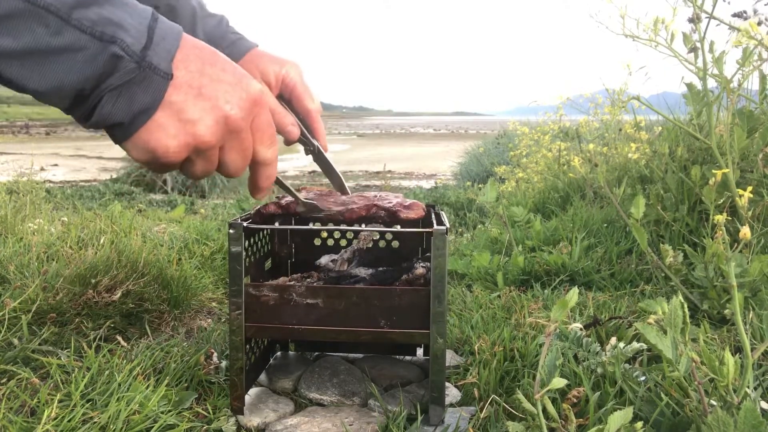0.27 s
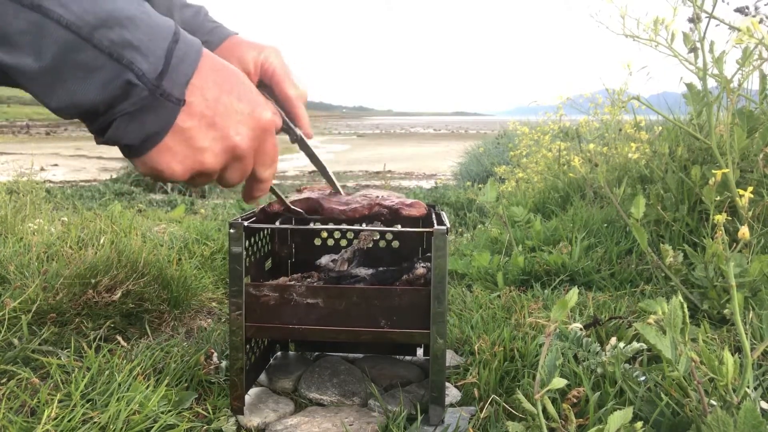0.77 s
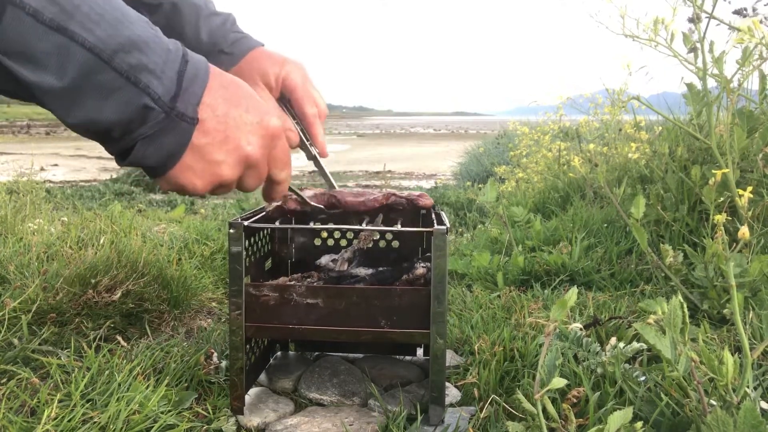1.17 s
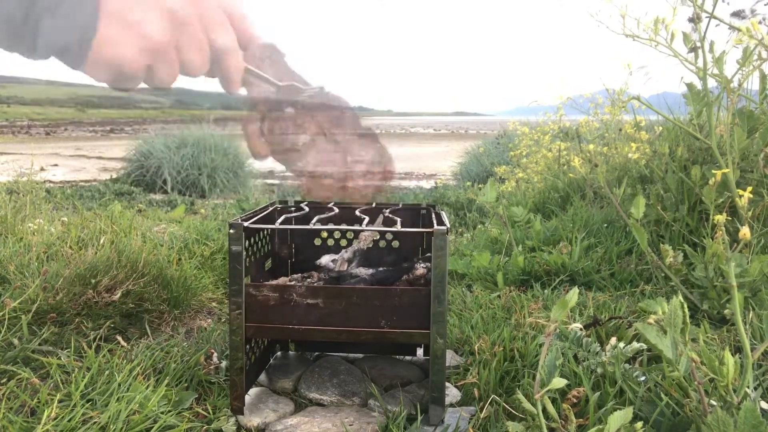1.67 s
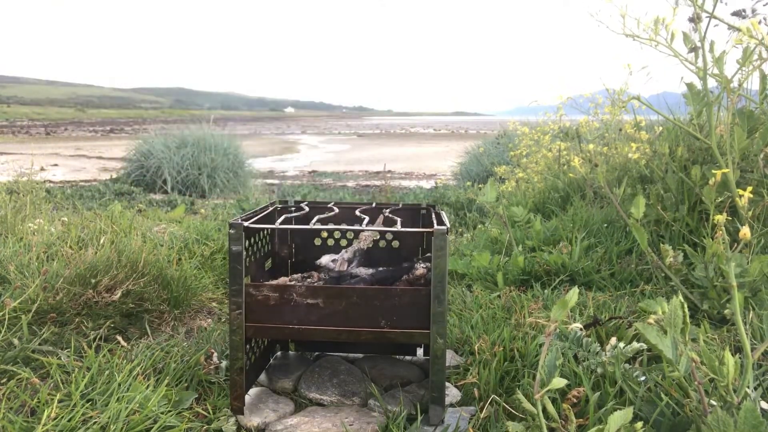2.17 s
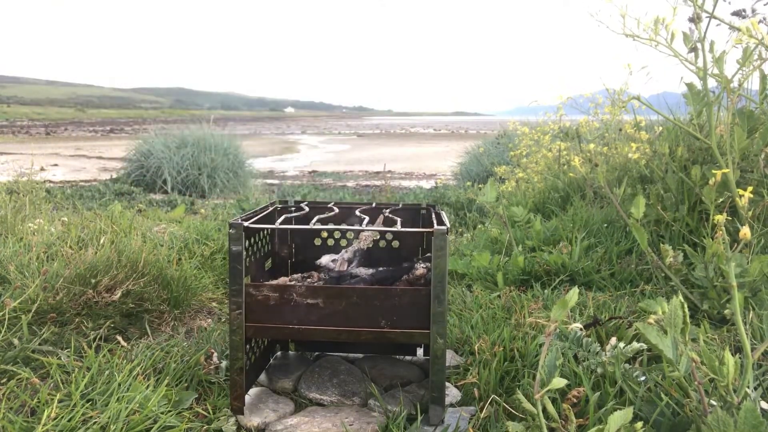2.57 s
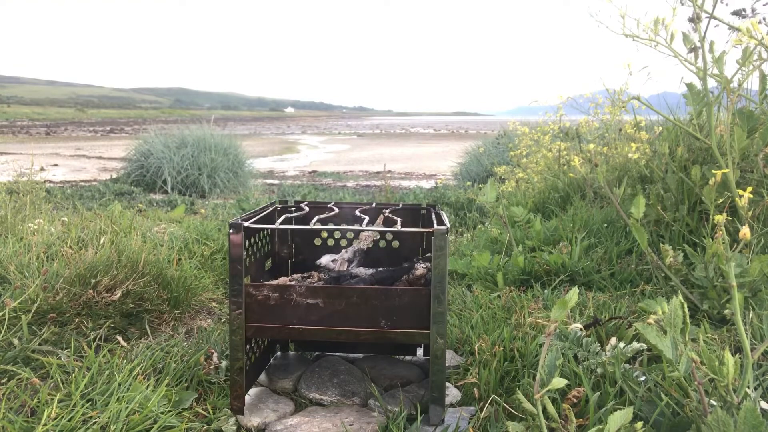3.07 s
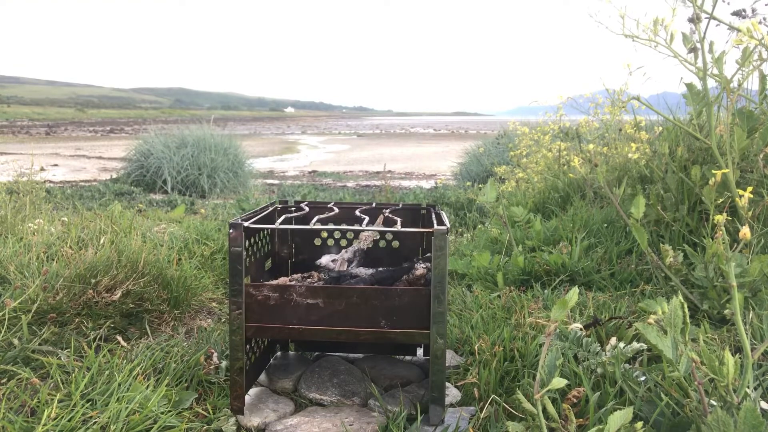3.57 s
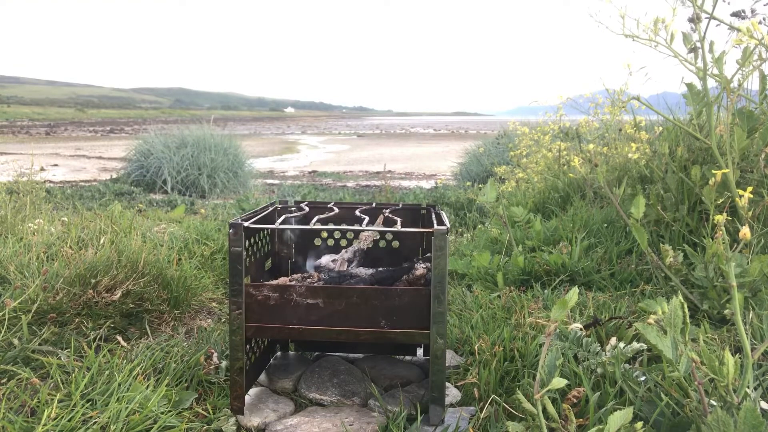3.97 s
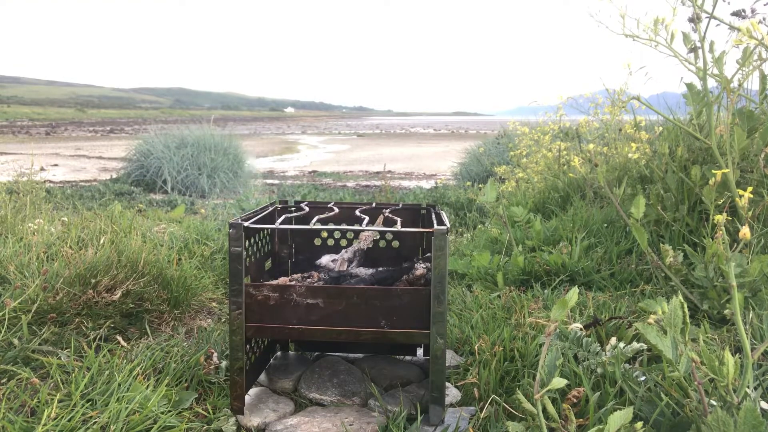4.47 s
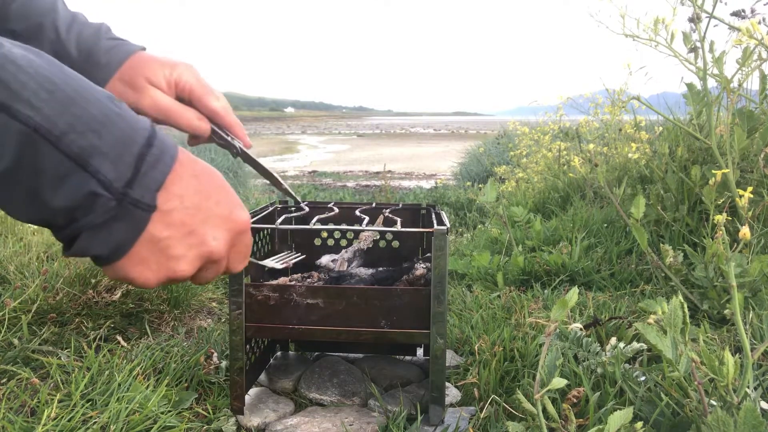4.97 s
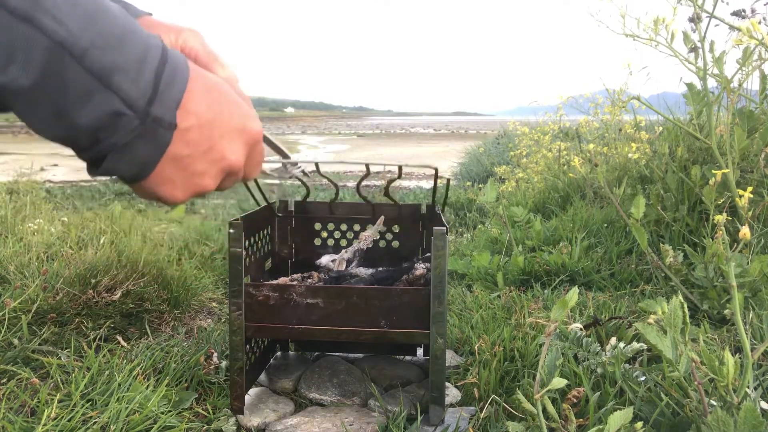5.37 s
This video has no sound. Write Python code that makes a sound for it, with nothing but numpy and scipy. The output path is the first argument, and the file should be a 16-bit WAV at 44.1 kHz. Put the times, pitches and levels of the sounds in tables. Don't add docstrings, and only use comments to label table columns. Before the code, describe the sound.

Wind buffets an open-air microphone while meat sizzles faintly, cutlery scrapes a wire grill, then thin metal clatters and scrapes loudly before quieting.

```python
import sys
import numpy as np
from scipy import signal
from scipy.fft import rfft, irfft
from scipy.io import wavfile
from scipy.ndimage import uniform_filter1d

SR = 44100
rng = np.random.default_rng(int(sys.argv[2]) if len(sys.argv) > 2 else 0)


def natural_amplitude(level_db):
    exponent = np.asarray(level_db, float) / 20
    return 10 ** exponent


def wav_record(signal):
    frames = np.transpose(np.atleast_2d(signal))
    bounded = np.clip(frames, -1, 1)
    quanta = np.round(bounded * 32767).astype(np.int16)
    wavfile.write(sys.argv[1], SR, quanta)


N = 248724
TIME = np.arange(N) / SR

# (time [s], level [dB])
GUST = [(0, -9), (.11, -25.5), (.31, -8), (.63, -14), (1.0, -9), (1.32, -15), (1.4, -5), (1.58, -13.5),
        (1.7, -25.5), (1.9, -12.5), (2.09, -25.5), (2.31, -21), (2.7, -21), (3.41, -40), (3.74, -20),
        (4.11, -43), (4.63, -22), (5.64, -32.5)]
# (frequency [Hz], density [dB/Hz])
BUFFET_SPECTRUM = [(1, 2.5), (3, 13), (6, 9), (12, -6.5), (22, -18.5), (34, -41), (70, -38), (200, -130)]
# (frequency [Hz], density [dB/Hz])
RUMBLE_SPECTRUM = [(15, 0), (26, 2), (40, -0.5), (70, -12.5), (120, -19.5), (250, -34), (500, -36),
                   (1500, -120)]
# (time [s], half length [s], rumble lift [dB])
FLUTTERS = [(0.158, 0.081, -6), (.62, 0.075, 8.5), (1.0, 0.078, 3), (1.4, .2, 3), (1.9, .2, -5),
            (2.55, 0.065, 6), (3.2, 0.11, 5), (4.27, .07, 5.5), (4.85, .3, -6.5), (2.46, .04, -8),
            (1.62, .04, 6), (5.3, .2, 4), (5.64, 0.044, 16)]
# (frequency [Hz], density [dB/Hz])
SHORE_SPECTRUM = [(90, -1), (150, -3), (360, -9), (690, -5.5), (1100, -8), (1800, -8.5), (3000, -9),
                  (4300, -14), (8000, -18), (10000, -25), (12000, -32), (15000, -32), (16000, -30)]
# (time [s], level [dB])
SHORE_SWELL = [(0, -59), (.55, -56), (.85, -55), (1.5, -50), (1.85, -53), (3, -45.5), (3.9, -53.5),
               (4.4, -48.5), (5.64, -52)]
# (time [s], level [dB], top [Hz], t60 [s])
PRESSES = [
    (.872, -37.5, 1300, 0.11),
    (.9, -38.5, 1300, 0.42),
    (1.435, -47, 900, 0.092),
    (4.191, -33, 1300, 0.18),
    (4.211, -37, 1500, 0.2),
]
# (time [s], level [dB])
SIZZLE = [(0, -64), (.17, -57), (.6, -51.5), (1.41, -50.5), (1.5, -47), (1.66, -56.5), (2.1, -57.5),
          (2.92, -48.5), (3.1, -63), (3.55, -83.5), (4.1, -53), (4.2, -51.5), (4.63, -55.5), (4.9, -52),
          (5.64, -83)]
# (time [s], peak [dB], centre [Hz])
POPS = [(0.0478, -39, 6600), (0.1266, -33.5, 6000), (0.159, -38, 5900), (0.2044, -41, 5750),
        (0.2339, -33, 6250), (0.2493, -28, 6940), (0.3474, -44, 6900), (0.5126, -25, 6820),
        (0.5596, -33, 6750), (0.7078, -44, 7870), (0.7214, -37, 6210), (0.7512, -42, 6080),
        (0.7756, -32, 6500), (0.8094, -34, 8750), (0.8444, -48, 5660), (.71, -45, 14000),
        (.752, -45, 14200), (.777, -39, 14300), (.81, -41, 13000), (.98, -38, 14000), (1.5953, -34, 7100),
        (1.6387, -36, 6370), (3.5174, -40, 5460), (3.6182, -35, 5430), (3.7, -50, 5500)]
# (time [s], peak [dB])
TICKS = [(1.672, -19.5), (.001, -30), (2.2325, -8), (2.318, -14), (2.396, -8), (2.4363, -8), (2.4877, -16),
         (3.52, -38), (3.6182, -36), (3.7, -39), (3.752, -39), (3.9384, -14), (2.9763, -23), (3.358, -4.5),
         (3.7867, -30), (4.1099, -18.5), (4.119, -20), (4.486, -28), (5.008, -31), (5.0155, -28.5),
         (5.072, -26), (5.3744, -35), (5.5897, -37)]
# (time [s], peak [dB], pitch [Hz], t60 [s], half the relative pitch rise [1/s])
THUDS = [(.876, -25, 98, .12, -2.5), (0.904, -15, 91, 0.093, -2), (.912, -32, 137, 0.083, -2),
         (1.706, -44, 450, 0.07, 18), (1.717, -39, 640, 0.075, 6.5), (1.721, -47, 1390, 0.04, 2.5),
         (2.44, -29.5, 263, 0.15, 0.5), (2.599, -33.5, 157, 0.16, 1.5), (2.597, -25.5, 267, 0.13, -1),
         (3.358, -24, 205, 0.08, 2.5), (3.14, -34, 320, .12, 1), (4.194, -23, 130, 0.08, 2),
         (4.21, -30, 107.4, 0.16, -1), (4.225, -38, 65, 0.13, 4), (4.211, -28, 250, 0.063, 1)]
# (time [s], peak [dB], pitch [Hz], t60 [s])
CLINKS = [(0.01003, -57, 690, 1.1), (.01, -63, 1747, 4), (.01, -68.5, 2600, 2.9), (2.845, -27, 690, 0.17),
          (2.318, -11, 720, .09), (2.318, -11, 1540, .08), (2.233, -14, 700, .08), (2.233, -16, 2620, .1),
          (2.347, -14, 700, .1), (3.46, -51, 690, 2.5), (5.229, -40, 1656, 0.57), (5.482, -32, 1690, .3),
          (5.485, -34, 2480, .12), (5.49, -43, 3150, 0.27), (5.42, -47, 2900, .2), (5.4, -43, 1500, .12),
          (.876, -41, 1150, .1), (.812, -54, 8500, .09), (2.111, -31.5, 397, 0.083),
          (2.98, -22.5, 550, 0.022), (3.1, -35, 524, 0.24), (4.223, -42.5, 1400, .35),
          (4.277, -44, 610, .04), (1.279, -37, 2700, 0.2), (2.084, -34, 354, 0.062),
          (4.03, -33.5, 320, 0.048), (3.762, -49, 840, 0.13), (2.195, -31.5, 4300, 0.09),
          (2.272, -31, 6400, .08), (2.289, -31, 5500, 0.12), (2.352, -27.5, 6830, .2),
          (2.384, -21, 6850, 0.067), (2.451, -24, 6300, .04), (2.438, -3.5, 910, 0.032),
          (3.941, -4.5, 4160, 0.0055), (3.939, -13, 4830, 0.019), (3.939, -10, 2890, 0.012),
          (3.939, -38, 6100, 0.022), (4.055, -19.5, 3900, 0.033), (3.976, -17.5, 740, 0.086),
          (3.041, -40, 1290, .2), (3.25, -27.5, 700, 0.23), (3.945, -18, 620, 0.018),
          (4.062, -28, 2300, 0.048), (4.012, -25, 3560, .04), (4.056, -25, 5400, .03)]
# (hardest moment [s], swell [s], fade [s], stove body [dB], wire re body [dB])
GRILL_STROKES = [(.595, 0.01, 0.081, -34.5, 8.5), (.72, 0.072, 0.072, -55, 7), (.9, 0.024, 0.38, -43.5, -1),
                 (.99, 0.12, 0.09, -41.5, 0), (1.1, 0.23, 0.99, -50, -3.5), (1.285, 0.024, 0.1, -46, -2),
                 (1.39, 0.093, .1, -52, 7), (1.455, 0.15, 0.099, -35.5, 1.5), (1.53, 0.11, .05, -47, -12),
                 (4.205, 0.018, 0.12, -43.5, -15), (4.28, 0.23, 0.41, -47, -2),
                 (5.215, .002, 0.1, -32.5, 4.5), (5.235, 0.019, .16, -30.5, 0.5),
                 (5.404, 0.1, 0.25, -43.5, -7), (5.465, 0.018, 0.053, -37.5, -10),
                 (5.483, 0.011, 0.096, -31, 2), (5.591, 0.003, 0.05, -44.5, 2),
                 (5.375, .004, 0.043, -51.5, 6), (5.62, 0.034, 0.18, -33.5, -3)]
# (time [s], body peak [dB], boom re peak [dB], wire re peak [dB], chatter t60 [s])
GRILL_CATCHES = [
    (0.593, -25, -27, -7, 0.32),
    (0.875, -39.5, 6, -20, 0.12),
    (1.278, -23.5, -33, 8, 0.15),
    (1.394, -43, -20, 6, 0.1),
    (1.504, -29.5, -16, 2, 0.16),
    (5.214, -23.5, -9, 12, 0.15),
    (5.482, -40, -21, -18, 0.1),
]
# (frequency [Hz], width [Hz], level [dB])
WIRE_MODES = [(1700, 34, -32), (5750, 24, 6), (6330, 160, -4), (6730, 25, 3), (9440, 34, -4),
              (10470, 170, -5.5), (14000, 600, -12), (15000, 600, -15)]
# (frequency [Hz], density [dB/Hz])
STOVE_SHEET = [(180, -35), (300, -49), (842, -8), (1010, -6), (1810, 2.5), (2700, -4), (4020, -9),
               (4440, -10.5), (6520, -1.5), (9550, -6), (11000, -12.5), (11900, -22), (14200, -20),
               (16000, -14)]
# (hardest moment [s], swell [s], fade [s], push [dB], bright edge re push [dB])
PAN_STROKES = [(2.115, 0.019, 0.056, -27.5, -14), (2.165, 0.072, 0.1, -28, -10.5),
               (2.205, 0.075, 0.041, -37.5, 4.5), (2.237, 0.0033, 0.092, -31, 1.5),
               (2.293, 0.093, 0.33, -21, -10.5), (2.37, 0.21, 0.16, -26, -0.5),
               (2.449, 0.086, 0.046, -18, -3), (2.478, 0.076, 0.05, -22, -27),
               (2.493, .008, 0.096, -21, -5.5), (2.525, 0.032, 0.095, -15.5, -6.5),
               (2.612, 0.085, 0.27, -18, -4), (2.64, .05, 0.055, -25.5, 2.5), (2.7, 0.11, 0.049, -24.5, 3),
               (2.784, 0.16, 0.11, -27, -6.5), (2.852, 0.022, .07, -31.5, -7.5), (3.07, .05, .1, -50, -21),
               (3.149, 0.028, 0.27, -14.5, -7.5), (3.195, 0.09, 0.11, -18.5, -2.5),
               (3.245, 0.15, 0.11, -21.5, 4), (3.318, 0.19, 0.022, -28, 3.5),
               (3.411, 0.034, 0.032, -25, -4.5), (3.945, 0.0038, 0.19, -24, -10.5),
               (3.976, 0.003, 0.077, -16, -24), (4.015, 0.056, 0.0082, -15, -9.5),
               (4.058, 0.21, 0.033, -39, 11), (4.109, 0.0077, 0.052, -42, -6),
               (3.365, 0.011, 0.04, -22.5, -18)]
# (time [s], peak [dB], boom re peak [dB], bright part re peak [dB], chatter
# t60 [s])
PAN_KNOCKS = [(2.072, -23, -11.5, -13, 0.018), (2.082, -22.5, -8, -12, 0.046), (2.107, -18, -5, -17, 0.048),
              (2.138, -23.5, -1, -16, 0.037), (2.156, -15.5, -26, -14, 0.045), (2.17, -16, -22, -13, 0.049),
              (2.232, -6, -28, -10, 0.066), (2.29, -14.5, -5, -23, 0.043), (2.318, -4.5, -30, -24, 0.12),
              (2.3455, -4, -40, -15, 0.098), (2.351, -7, -30, -3, 0.048), (2.396, -6, -6.5, 1, 0.036),
              (2.436, -3.5, -21, -10, 0.04), (2.451, -9, -20, -3, .04), (2.462, -13, -20, -8, .03),
              (2.4875, -11, -14, -6, 0.049), (2.5132, -4.5, -11, -12, 0.061), (2.523, -12, -20, -4, .03),
              (2.547, -7.5, -13, -20, 0.059), (2.568, -14, -18, -20, 0.027), (2.592, -7, -33, -12, 0.029),
              (2.6, -3, -13, -6, 0.018), (2.611, -4, -36, -16, 0.04), (2.636, -11, -21, -14, 0.038),
              (2.7, -12, -36, -7, 0.1), (2.776, -20, -42, -14, 0.12), (2.844, -20, -13, -27, 0.13),
              (2.979, -22, -19, -3, 0.012),
              (3.099, -29.5, -12, -20, 0.037), (3.141, -27, -17, -14, .04), (3.176, -10, -20, -14, .03),
               (3.204, -9, -16, -14, .03), (3.24, -10, -21, -8, 0.032), (3.404, -18, -20, -6, .04),
               (3.358, -5, -14, -2.5, 0.019), (3.364, -11.5, -16, -2, 0.039), (3.76, -37, 5, -17, 0.015),
               (3.938, -11.5, -15, 2, 0.029), (3.944, -13, -4.5, -19, 0.025), (3.973, -6, -15, -28, 0.05),
               (4.012, -14, -20, -2, 0.033), (4.054, -22.5, -6, 6, 0.02), (4.061, -25, -12, -1, 0.044),
               (4.11, -34, -20, -8, .03), (4.119, -33, -20, -8, 0.031)]
# (frequency [Hz], width [Hz], level
# [dB])
PAN_MODES = [(268.5, 18, -12), (685, 34, 2), (900, 83, 0.5), (1300, 50, 4), (1670, 71, 6), (2623, 66, 0.5),
             (3060, 73, -13.5), (3680, 70, -13), (4560, 45, -16), (5130, 60, -12.5), (5500, 39, -12),
             (6330, 100, -14.5), (6900, 37, -16),
             (613, 25, -6), (1059, 28, -4.5), (1460, 32, 3.5), (1557, 28, 3.5), (1753, 33, -2),
                  (2052, 57, -2.5), (2530, 27, -2.5), (5840, 46, -22), (7110, 40, -16), (8000, 130, -13),
                  (9370, 84, -20.5)]
# (frequency [Hz], density [dB/Hz])
PAN_SHEET = [(120, -50), (200, -7.5), (366, -19), (683, -8), (1160, -5), (1650, 10.5), (2250, -61),
             (2610, -2), (2910, -5.5), (8270, -5.5), (9800, -8), (11300, -14), (13300, -12), (16000, -19)]
# (frequency [Hz], width [Hz], level [dB])
HELD_MODES = [(344, 55, -19), (495, 81, -11), (622, 60, -10.5), (738, 50, -1), (1025, 46, -3.5),
              (1341, 72, -3), (1550, 100, 1), (1702, 92, 1), (1987, 80, -1.5), (2125, 55, -0.5),
              (2547, 115, -1), (3080, 90, -11.5), (3640, 190, -8.5), (4330, 94, -12)]
# (frequency [Hz], density [dB/Hz])
HELD_SHEET = [(120, -39), (300, -14), (700, -7), (1600, 0), (2300, -9.5), (5000, -5.5), (8300, -7.5),
              (10000, -13), (11400, -19.5), (13000, -13.5), (16000, -21)]
# (time [s], tilt [dB/octave])
PAN_SLIDE = [(2.07, -0.5), (2.13, -7), (2.17, 1), (2.3, -4), (2.42, -1.5), (2.5, 1.5), (2.6, 1), (2.7, 2),
             (2.78, 2.5), (2.86, -1.5), (3.1, -4), (3.2, -.5), (3.25, -0.5), (3.285, 9), (3.36, -1),
             (3.41, 5), (3.95, -3), (4.02, 2)]

FLAT_START_S, FLAT_END_S = 2.22, 3.02
STROKE_RANGE_DB = 20
STROKE_ROUND = 1.435
SWELL_STEEP, FADE_STEEP = (1.07, 0.81, 1.8), (1.34, 2.07, 1.67)


def unit(x):
    return x / np.sqrt(np.mean(x ** 2))


def curve(points):
    return np.interp(TIME, *np.transpose(points))


def colour(x, points):
    hz, db = np.transpose(points)
    f = np.maximum(np.arange(len(x) // 2 + 1) * SR / len(x), .1)
    gain_db = np.interp(np.log(f), np.log(hz), db)
    return irfft(rfft(x) * natural_amplitude(gain_db), len(x))


def ring(x, hz, width_hz):
    return signal.lfilter(*signal.iirpeak(hz, hz / max(width_hz, 5), fs=SR), x)


def split(x, hz):
    return [signal.sosfilt(signal.butter(5, hz, kind, fs=SR, output="sos"), x, axis=-1)
            for kind in ("low", "high")]


def thirds(x, edges_hz):
    low, rest = split(x, edges_hz[0])
    mid, high = split(rest, edges_hz[1])
    return mid, low, high


def walk(rate_hz):
    hold = int(SR / rate_hz)
    steps = np.repeat(rng.standard_normal(N // hold + 1), hold)
    return unit(uniform_filter1d(uniform_filter1d(steps, hold), hold)[:N])


def grit(rate_hz, spread_db):
    slips = (rng.random(N) < rate_hz / SR) * rng.standard_normal(N)
    return unit(slips * natural_amplitude(spread_db * np.minimum(rng.exponential(size=N), 4)))


def shore():
    low, high = split(unit(colour(rng.standard_normal(N), SHORE_SPECTRUM)), 2230)
    wash = natural_amplitude(1.2 * walk(8)) * low + natural_amplitude(.8 * walk(6)) * high
    return natural_amplitude(curve(SHORE_SWELL)) * wash


def capsule_hiss():
    return natural_amplitude(-62) * rng.standard_normal(N)


def wind():
    gust_db = curve(GUST)
    push = unit(colour(rng.standard_normal(N), BUFFET_SPECTRUM))
    slow = natural_amplitude(gust_db) * 1.8 * np.tanh(push / 1.5)
    slow += (.09 - slow[0]) * np.exp(-TIME / .05)
    rumble_db = -33 + 0.43 * uniform_filter1d(gust_db, size=int(0.67 * SR))
    rumble_db += 27.5 * np.exp(-TIME / 0.02)
    for s, half_s, lift_db in FLUTTERS:
        rumble_db += lift_db * np.exp(-((TIME - s) / half_s) ** 2)
    rumble = natural_amplitude(rumble_db + 1.0 * walk(3.44)) * unit(colour(rng.standard_normal(N), RUMBLE_SPECTRUM))
    return slow + rumble


def presses():
    out, t = np.zeros(N), TIME[:16384]
    for s, db, hz, t60 in PRESSES:
        noise = rng.standard_normal(len(t))
        body = unit(colour(noise, [(150, -30), (300, 0), (hz, -2.5), (hz * 2, -20), (hz * 4, -60)]))
        out[int(s * SR):][:len(t)] += natural_amplitude(db - 60 * t / t60) * (1 - np.exp(-t / 0.0024)) * body
    return out


def sizzle():
    bubbles = grit(4000, 3.0) * natural_amplitude(1.5 * walk(25))
    body = split(split(ring(bubbles, 6060, 3400), 5000)[1], 8900)[0]
    top = split(bubbles, 12500)[1]
    return natural_amplitude(curve(SIZZLE) - 2.0) * unit(body + natural_amplitude(-16) * top)


def pops_and_ticks():
    out, t = np.zeros(N + 16384), TIME[:16384]
    ticks = [(s, db, 4240) for s, db in TICKS]
    for table, cycles, lift_db in ((POPS, 3.5, -1.5), (ticks, .35, 5.5)):
        for s, db, hz in table:
            tone = np.sin(2 * np.pi * hz * t) * np.exp(-t * hz / cycles)
            out[int(s * SR):][:len(t)] += natural_amplitude(db + lift_db) * tone
    return out[:N]


def thuds():
    out, t = np.zeros(N + 16384), TIME[:16384]
    for s, db, hz, t60, glide in THUDS:
        loose = uniform_filter1d(rng.standard_normal(len(t)), size=int(SR / hz))
        wobble = 1 + 0.32 * unit(loose)
        tone = wobble * np.sin(2 * np.pi * hz * t * (1 + glide * t))
        out[int(s * SR):][:len(t)] += natural_amplitude(db - 60 * t / t60) * (1 - np.exp(-t * hz / 0.22)) * tone
    return out[:N]


def clinks():
    out, t = np.zeros(N + 16384), TIME[:16384]
    for s, db, hz, t60 in CLINKS:
        out[int(s * SR):][:len(t)] += natural_amplitude(db - 60 * t / t60) * np.sin(2 * np.pi * hz * t)
    return split(out[:N] * natural_amplitude(3.0 * walk(90)), 200)[1]


def strokes(rows, boom_db):
    power = np.zeros((3, N))
    for s, swell_s, fade_s, db, edge_db in rows:
        near = slice(max(int((s - 3 * swell_s) * SR), 0), int((s + 3 * fade_s) * SR))
        t = TIME[near] - s
        for k, part_db in enumerate((0, boom_db, edge_db)):
            before = -t * SWELL_STEEP[k] / max(swell_s, .002)
            after = t * FADE_STEEP[k] / max(fade_s, .002)
            away = np.where(t < 0, before, after)
            power[k, near] += natural_amplitude(db + part_db - STROKE_RANGE_DB * away ** STROKE_ROUND) ** 2
    return np.sqrt(power)


def sheet(points, t60_low, t60_high):
    t = TIME[:2048]
    low, high = split(colour(rng.standard_normal(len(t)), points), 2630)
    h = low * natural_amplitude(-60 * t / t60_low) + high * natural_amplitude(-60 * t / t60_high)
    return h / np.sqrt(np.sum(h ** 2))


def metal(rub, hits, modes, spectrum, edges_hz, slips, slide_db, t60_low, t60_high, sheet_db,
          rub_db, blow_db, chatter_db, vary_db, crack_db, stick):
    def clear(x, shares, tilt_db):
        total = 0
        for k, (hz, width_hz, db) in enumerate(modes):
            drive = x * shares[k] * natural_amplitude(tilt_db * np.log2(hz / 1500))
            total = total + (-1) ** k * natural_amplitude(db) * ring(drive, hz, width_hz)
        return total

    def dense(x):
        return natural_amplitude(sheet_db) * signal.oaconvolve(x, sheet(spectrum, t60_low, t60_high))[:len(x)]

    def crack(noise):
        return natural_amplitude(crack_db) * split(noise * np.exp(-TIME[:len(noise)] / 0.00024), 940)[1]

    jump = rng.integers(0, 3, N // 512 + 1).repeat(512)[:N]
    place = (np.arange(N) // 512 + jump) % 4
    shares = [natural_amplitude(0.36 * vary_db * walk(11)) for _ in modes]
    steady = clear(slips, shares, slide_db) + sum(dense(slips * (place == k)) for k in range(4))
    out = sum(gain * natural_amplitude(rub_db) * unit(part) for gain, part in zip(rub, thirds(steady, edges_hz)))

    for s, *_ in hits:
        i = int(s * SR)
        out[i - 1024:i] *= 1 - np.clip(stick, 0, 1) * np.exp(-TIME[1024:0:-1] / .006)

    size = 4096
    for s, db, low_db, high_db, t60 in hits:
        i = int(s * SR)
        noise = rng.standard_normal(size)
        shares = natural_amplitude(vary_db * rng.standard_normal(len(modes)))
        force = natural_amplitude(chatter_db) * noise ** 3 * natural_amplitude(-60 * TIME[:size] / max(t60, .01))
        force[0] += 1
        parts = thirds(clear(force, shares, slide_db[i]) + dense(force) + crack(noise), edges_hz)
        blow = sum(natural_amplitude(db + blow_db + part_db) * part / abs(part).max()
                   for part_db, part in zip((0, low_db, high_db), parts))
        out[i:i + size] += blow[:N - i]
    return out


def grill():
    rub = grit(9000, 0.85) * natural_amplitude(1.0 * walk(50))
    return metal(strokes(GRILL_STROKES, boom_db=-9), GRILL_CATCHES, WIRE_MODES, STOVE_SHEET, (675, 4250),
                 rub, np.zeros(N), t60_low=0.04, t60_high=0.094, sheet_db=-7.5, rub_db=-1.0, blow_db=-5.0,
                 chatter_db=-15, vary_db=-3.5, crack_db=-24, stick=0.43)


def pan():
    def lying(rows):
        return [row for row in rows if FLAT_START_S < row[0] < FLAT_END_S]

    def gripped(rows):
        return [row for row in rows if not FLAT_START_S < row[0] < FLAT_END_S]

    drag = grit(14000, 2.4) * natural_amplitude(1.6 * walk(70) + 1.2 * walk(160))
    knocks = PAN_KNOCKS
    slide_db = curve(PAN_SLIDE)
    flat = metal(strokes(lying(PAN_STROKES), boom_db=-17.5), lying(knocks), PAN_MODES,
                 PAN_SHEET, (535, 3200), drag, slide_db, t60_low=0.045, t60_high=0.034, sheet_db=-18.0,
                 rub_db=-1.5, blow_db=-2.5, chatter_db=-33.5, vary_db=3.0, crack_db=-22.0, stick=0.49)
    held = metal(strokes(gripped(PAN_STROKES), boom_db=-16), gripped(knocks), HELD_MODES,
                 HELD_SHEET, (535, 2850), drag, slide_db, t60_low=0.027, t60_high=0.037, sheet_db=-14.0,
                 rub_db=-3.0, blow_db=-4.0, chatter_db=-26.5, vary_db=1.0, crack_db=-20.5, stick=0.36)
    direct = split(flat + held, 180)[1]
    echo_ms, echo_db = 1.613, -15
    return direct + natural_amplitude(echo_db) * np.roll(direct, int(echo_ms * SR / 1000))


def scene():
    background = shore() + capsule_hiss() + wind()
    details = presses() + sizzle() + pops_and_ticks() + thuds() + clinks()
    return (background + details + grill() + pan())[None]


def band_limit(x):
    return signal.sosfilt(signal.butter(12, 15850, fs=SR, output="sos"), x)


def record(dry):
    top = 0.94
    rounded = top * np.tanh(dry / top)
    mix = signal.sosfilt(signal.butter(18, 16150, fs=SR, output="sos"), rounded)
    return band_limit(mix)


dry = scene()
out = record(dry)
wav_record(out)
```